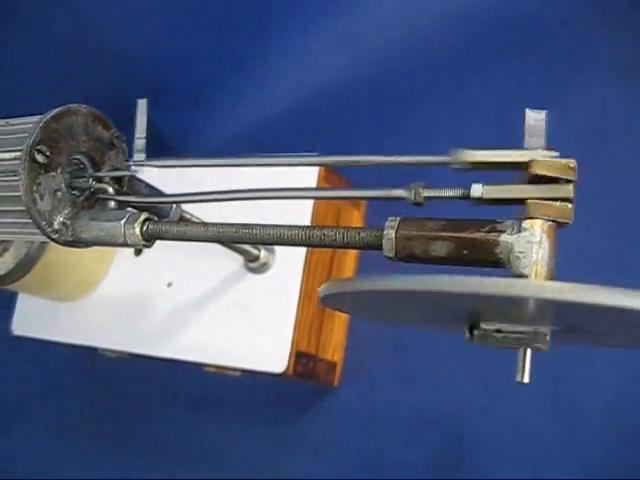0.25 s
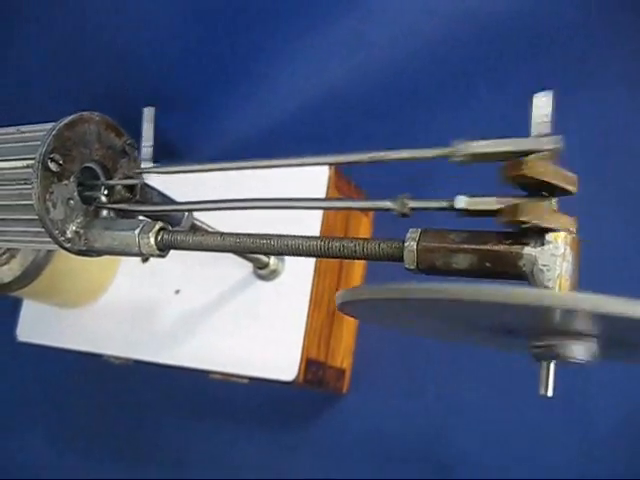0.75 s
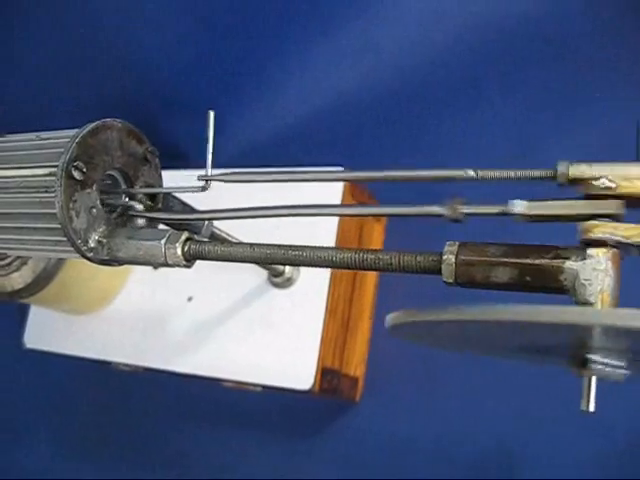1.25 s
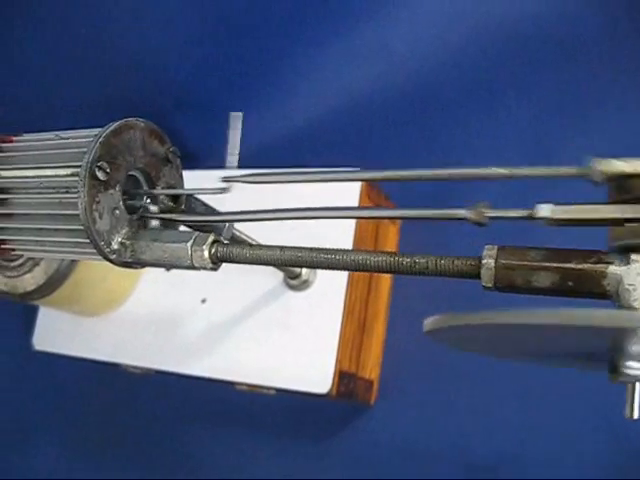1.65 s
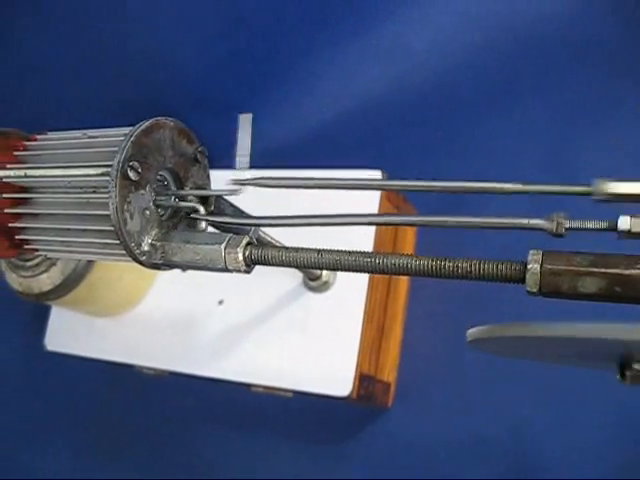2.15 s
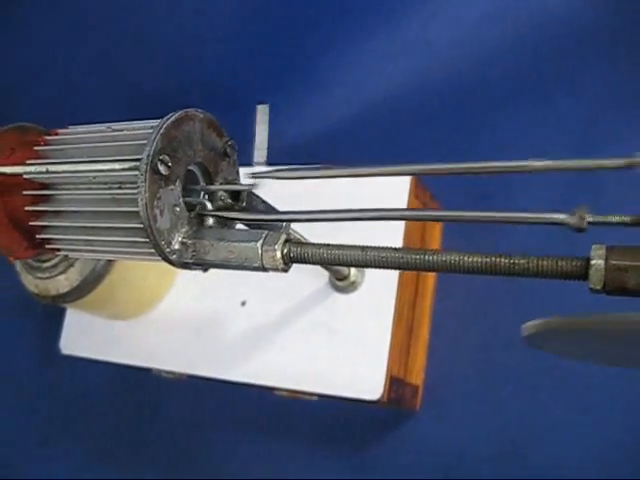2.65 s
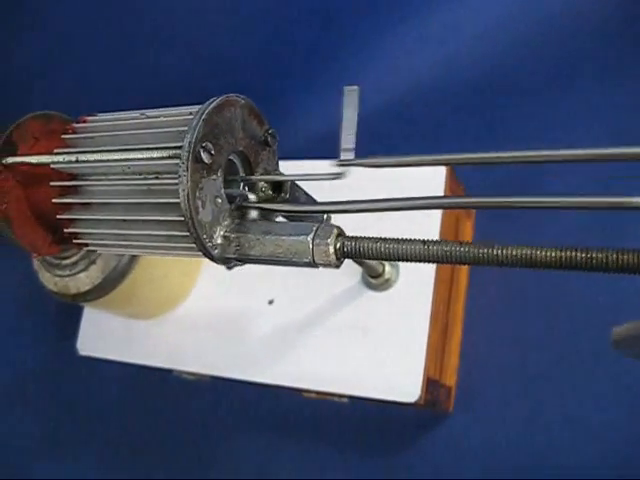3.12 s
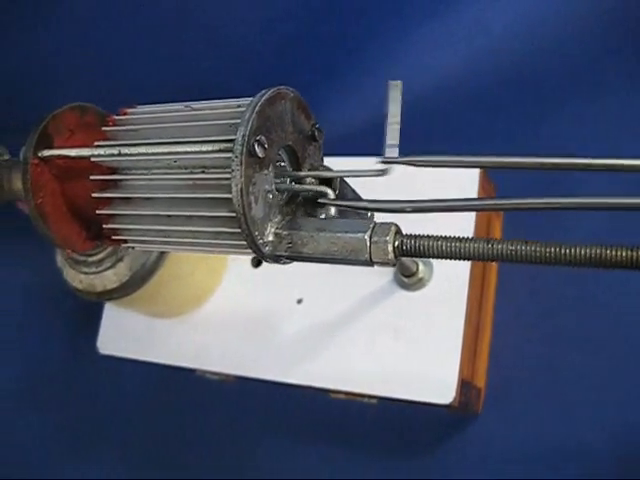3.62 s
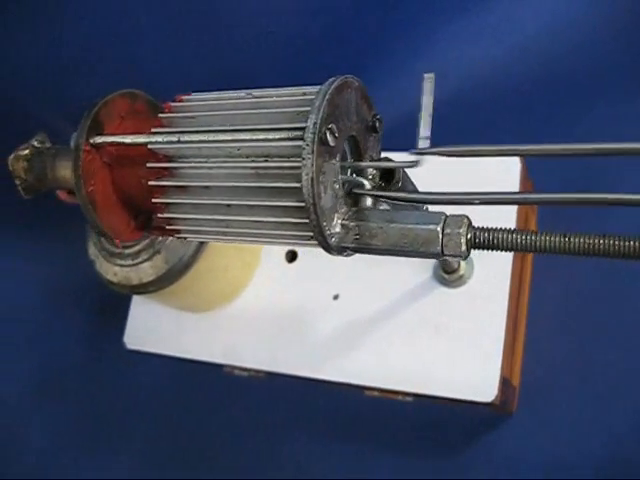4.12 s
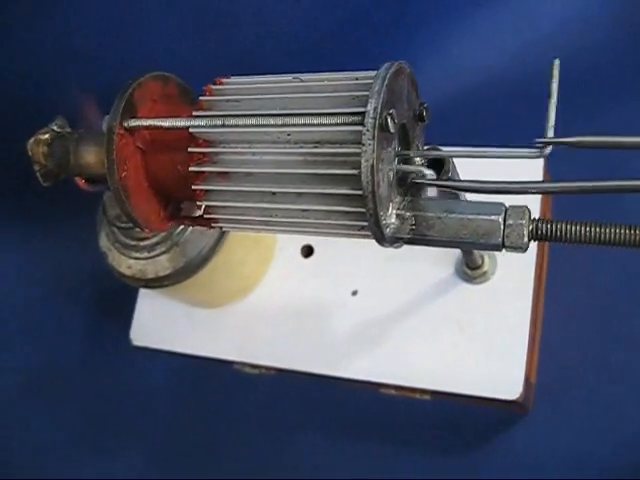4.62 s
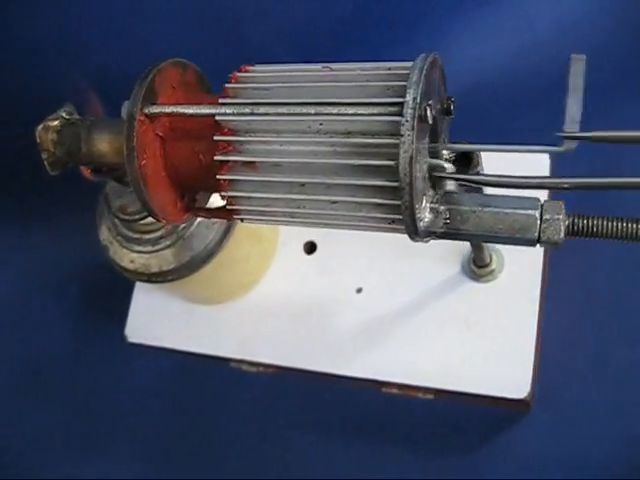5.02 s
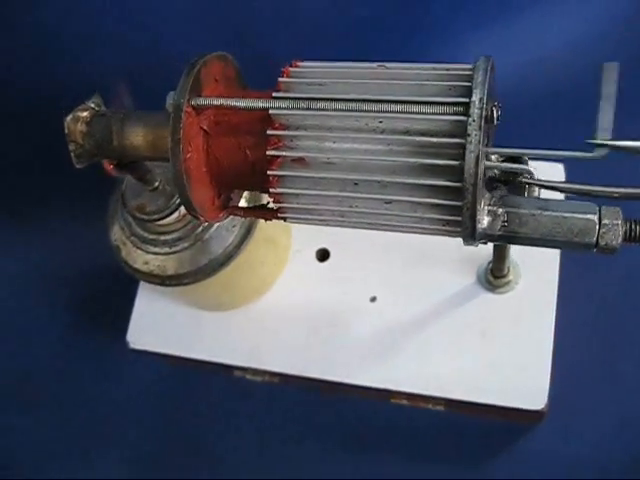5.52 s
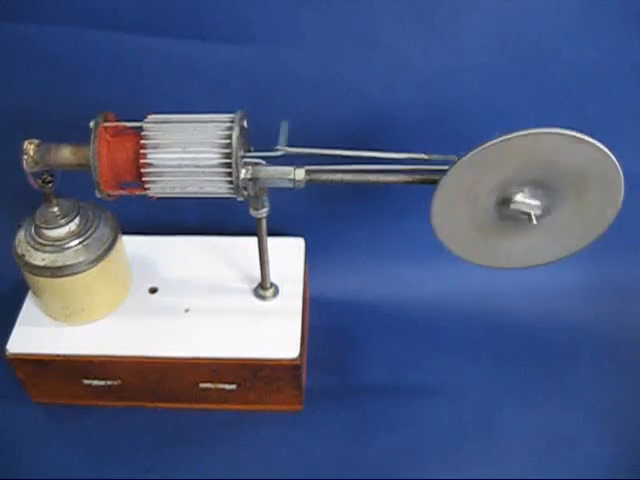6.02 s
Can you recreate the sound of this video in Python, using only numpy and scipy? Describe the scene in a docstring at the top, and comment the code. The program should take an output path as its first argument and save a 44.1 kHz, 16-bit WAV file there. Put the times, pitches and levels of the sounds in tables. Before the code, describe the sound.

Fast rhythmic metallic rattle and scrape of a little model engine, growing brighter and closer, with one sharp snap before an abrupt stop.

```python
"""A small home-made hot-air engine on a wooden box runs at about 4.7 turns a second.
Twice a turn noise slips ring the rod's modes as it scrapes through its guide and the linkage's as it rattles.
Noise bursts at set crank angles are the knocks of its joints; slower slips ring the box into a rumble.
The microphone moves from the flywheel to the cylinder; a slack part snaps once in a small room.
The recorder holds each sample twice and stops abruptly."""
import sys
import numpy as np
from scipy import signal
from scipy.io import wavfile

SR = 44100
rng = np.random.default_rng(int(sys.argv[2]) if len(sys.argv) > 2 else 0)


def persist_wave(psi):
    """Save psi, clipped to +-1, as 16-bit WAV."""
    counts = np.round(np.clip(psi, -1, 1) * 32767).astype(np.int16)
    wavfile.write(sys.argv[1], SR, np.atleast_2d(counts).T)


N = 276489
TIME_S = np.arange(N) / SR


def from_db(db):
    """Decibels to gain."""
    return 10 ** (np.asarray(db) / 20)


def rms_one(x):
    """Scale to unit power."""
    return x / np.sqrt(np.mean(x ** 2) + 1e-20)


def drift(cutoff_hz):
    """Slow random wander of unit rms: low-passed noise."""
    lowpass = signal.butter(2, cutoff_hz, fs=SR, output="sos")
    return rms_one(signal.sosfilt(lowpass, rng.standard_normal(N)))


def arch(at, start, top, end):
    """A quarter sine up from start to top and another down to end; zero outside."""
    return np.sin(np.pi / 2 * np.interp(at, [start, top, end], [0, 1, 0]))


def passing(angle, centre, spread):
    """A bell that reaches 1 each time the crank passes an angle; all in turns."""
    offset = (angle - centre + .5) % 1 - .5
    return np.exp(-.5 * (offset / spread) ** 2)


def resonate(force, modes):
    """Parallel two-pole resonances of alternating sign."""
    out = np.zeros(N)
    for k, (hz, width_hz, db) in enumerate(modes):
        r = np.exp(-np.pi * width_hz / SR)
        poles = [1, -2 * r * np.cos(2 * np.pi * hz / SR), r * r]
        gain = (-1) ** k * from_db(db) * (1 - r * r) / 2
        out += gain * signal.lfilter([1, 0, -1], poles, force + 1e-18)
    return out


def slips(per_s, spread_db, chatter_db, chatter_hz):
    """Tiny random slips of uneven size and sign, whose size swells and sinks as the surfaces chatter."""
    size_db = spread_db * rng.standard_normal(N) + chatter_db * drift(chatter_hz)
    sizes = rng.choice([-1, 1], N) * from_db(size_db)
    return sizes * (rng.random(N) < per_s / SR)


def dying_noise(t60_s):
    """A dense noise burst of unit energy that decays exponentially."""
    t = TIME_S[:int(t60_s * SR) + 2]
    burst = rng.standard_normal(len(t)) * from_db(-60 * t / t60_s)
    return burst / np.sqrt(np.sum(burst ** 2))


def room(x, wet_db, t60_s):
    """The nearby walls add a diffuse decaying tail."""
    return x + from_db(wet_db) * signal.fftconvolve(x, dying_noise(t60_s))[:N]


# crank position: time_s, position_turns
CRANK = [(-0.1015, -1), (1.3816, 6), (2.6517, 12), (3.9165, 18), (6.4440, 30)]


def crank_turns():
    """Crank position in turns, linear between the table's times."""
    return np.interp(TIME_S, *np.transpose(CRANK))


# gain along the microphone's path: time_s, rod_rel_db, linkage_rel_db
NEARNESS = [(0, -45, -35.5), (1.5, -42, -38), (2.7, -37, -37.5), (3.6, -29.5, -33), (4.5, -28.3, -33.5),
            (5.4, -26.5, -35.5), (5.9, -29.5, -38.5)]


def nearness():
    """Gains of rod and linkage as the microphone moves from flywheel to cylinder."""
    time_s, *columns_db = np.transpose(NEARNESS)
    return [from_db(np.interp(TIME_S, time_s, db)) for db in columns_db]


def hiss():
    """Soft steady noise, tilted to the bass by a one-pole filter."""
    return from_db(-54.0) * rms_one(signal.lfilter([1], [1, -.75], rng.standard_normal(N)))


TONE_PEAK_S, TONE_SWELL_S, TONE_FADE_S = 4.25, 1.2, .2
TONE_AT_PEAK_HZ, TONE_RISE_HZ_PER_S, TONE_PEAK_RMS_DB = 180, 12, -42


def low_tone():
    """A faint sine swells once, rising a little in pitch."""
    since_s = TIME_S - TONE_PEAK_S
    hz = TONE_AT_PEAK_HZ + TONE_RISE_HZ_PER_S * since_s
    swell = arch(since_s, -TONE_SWELL_S, 0, TONE_FADE_S)
    return np.sqrt(2) * from_db(TONE_PEAK_RMS_DB) * swell * np.sin(2 * np.pi * np.cumsum(hz) / SR)


# box vibration: multiple_of_crank_speed, nominal_rms_db
HUM = [(12, -49.5), (24, -43)]


def hum(turns):
    """The box vibrates on multiples of the crank speed, wavering in level and phase."""
    out = np.zeros(N)
    for multiple, db in HUM:
        level = from_db(db + 2.5 * drift(3))
        out += level * np.sin(2 * np.pi * multiple * turns + .7 * drift(3))
    return np.sqrt(2) * out


# flywheel and stand: centre_turn (0-1), spread_turns, pitch_hz, level_at_full_push_db
RINGS = [(.015, 0.016, 837, -42), (0.251, 0.057, 809, -44.5), (.29, 0.09, 891, -40.5),
         (.54, .06, 1222, -45), (.8, .13, 286.6, -46), (.875, 0.022, 787, -41), (.89, 0.055, 894, -48.5)]


def rings(angle, width_hz):
    """Noise rubs each mode of flywheel and stand into ringing while the crank passes its angle."""
    out = np.zeros(N)
    for centre, spread, hz, db in RINGS:
        push = passing(angle, centre, spread)
        ring = resonate(push * rng.standard_normal(N), [(hz, width_hz, 0)])
        out += from_db(db) * np.sqrt(np.mean(push ** 2)) * rms_one(ring)
    return out


# box resonances: pitch_hz, width_hz, rel_db
BOX = [(38, 36, -7.5), (58.5, 9, 1), (74, 18, -5.5), (115.5, 25, -1), (143.5, 21.8, -2), (182.6, 35, -7),
       (250, 151, -16), (292.7, 14.8, -8.5), (352, 890, -25.5)]
# extra shaking as the outward stroke turns round
HEAVE_TURN, HEAVE_SPREAD_TURNS, HEAVE_DB = .45, .04, 2


def box(turns):
    """The stand carries the shaking down into the hollow box as a run of soft thuds."""
    shake = from_db(HEAVE_DB * passing(turns, HEAVE_TURN, HEAVE_SPREAD_TURNS))
    force = shake * slips(per_s=900, spread_db=2.5, chatter_db=1.54, chatter_hz=53)
    highpass = signal.butter(2, 24, "high", fs=SR, output="sos")
    return rms_one(signal.sosfilt(highpass, resonate(force, BOX)))


# resonances of the snap: pitch_hz, width_hz, rel_db
SNAP_MODES = [(1120, 550, 1), (1470, 524, 4.5), (1830, 400, 3), (2350, 450, -11), (9230, 726, -10.5)]
# clicks of the one snap: time_s, click_db (the largest also sets the dry peak)
SNAP_CLICKS = [(4.0014, -9), (4.0044, -21), (4.016, -19), (4.035, -25)]


def snap():
    """Something slack snaps once: a few clicks ring modes duller than the joints'."""
    time_s, db = np.transpose(SNAP_CLICKS)
    clicks = np.zeros(N)
    clicks[np.round(time_s * SR).astype(int)] = from_db(db)
    ring = resonate(clicks, SNAP_MODES)
    return from_db(db.max()) * ring / np.abs(ring).max()


# joint resonances, also colouring the rush: pitch_hz, width_hz, rel_db
CLACK_MODES = [(1500, 990, 3), (3020, 1160, 5.5), (5280, 2600, 4)]


def rush(near_rod):
    """Close to the cylinder a soft noise fills the pauses between strokes."""
    return from_db(-21) * near_rod * rms_one(resonate(rng.standard_normal(N), CLACK_MODES))


STRAY_PER_S, STRAY_SPREAD_DB, STRAY_T60_S, STRAY_RMS_REL_DB = 45, 3.5, .012, -9


def stray_ticks():
    """Loose pins chatter at random angles, each tick a short spray of bounces."""
    force = np.zeros(N + SR)
    for at in np.flatnonzero(rng.random(N) < STRAY_PER_S / SR):
        burst = dying_noise(STRAY_T60_S) * from_db(STRAY_SPREAD_DB * rng.standard_normal())
        force[at:at + len(burst)] += burst
    return from_db(STRAY_RMS_REL_DB) * rms_one(force[:N])


# play taken up at the same angles every turn: angle_turn (0-1), clack_rel_db, rod_ring_rel_db
KNOCKS = [(.004, 2, -15), (.014, -5, -15), (.044, -7, -6), (.479, -2, -9), (.503, -1, -8), (.511, -4, -8),
          (.742, -20, -6), (.808, -7, -7), (.846, -13, -9), (.936, -21, -2)]


def knocks(uneven_db, first_contact_db, bounce_t60_s):
    """Forces on joints and rod: a contact, then a short spray of bounces that is new on every turn."""
    seconds, turns = np.transpose(CRANK)
    joints, rod = np.zeros((2, N + SR))
    for turn in range(int(turns[0]), int(turns[-1])):
        for angle, clack_db, ring_db in KNOCKS:
            at = int(np.interp(turn + angle, turns, seconds) * SR) + rng.integers(-20, 20)
            burst = dying_noise(bounce_t60_s)
            burst[0] += from_db(first_contact_db)
            burst *= from_db(uneven_db * rng.standard_normal())
            if 0 <= at < N:
                joints[at:at + len(burst)] += from_db(clack_db) * burst
                rod[at:at + len(burst)] += from_db(ring_db) * burst
    return joints[:N], rod[:N]


def clacks(on_joints, friction):
    """The joints ring to their own knocks and ticks and, almost as strongly, to the rod's grit."""
    force = rms_one(on_joints) + stray_ticks() + from_db(-2.5) * friction
    return from_db(-43) * rms_one(resonate(force, CLACK_MODES))


# the rod's strokes out and back: start_turn, fastest_turn, end_turn, scrape_rel_db, rattle_rel_db
STROKES = [(0, .29, 0.44, 4, 2), (.45, 0.57, 0.91, 1.5, -1.5)]
SCRAPE_POWER, RATTLE_POWER = 1.37, .6  # exponents on the rod's speed
IDLE_RATTLE_REL_DB = -14
# jolt of the linkage once a reversal has taken up its play
JOLT_REL_DB, PLAY_TURNS, JOLT_FADE_TURNS = 0, 0.022, .05


def strokes(angle):
    """Scrape and rattle strength: both follow the rod's speed, and each reversal jolts the rattle."""
    scrape, rattle_power = 0, from_db(IDLE_RATTLE_REL_DB) ** 2
    for start, fastest, end, scrape_db, rattle_db in STROKES:
        speed = arch(angle, start, fastest, end)
        since_jolt = (angle - start - PLAY_TURNS) % 1
        jolt = from_db(JOLT_REL_DB) * np.exp(-since_jolt / JOLT_FADE_TURNS)
        scrape = scrape + from_db(scrape_db) * speed ** SCRAPE_POWER
        rattle_power = rattle_power + (from_db(rattle_db) * speed ** RATTLE_POWER) ** 2 + jolt ** 2
    return scrape, np.sqrt(rattle_power)


# linkage resonances: pitch_hz, width_hz, rel_db
LINKAGE = [(637, 200, -7), (1220, 131, -1.5), (1664, 125, -0.5), (1960, 159, 4), (2458, 123, -1),
           (2742, 194, 1), (3190, 186, 4.5), (3616, 133, 7.5), (4167, 83, 3.5), (4660, 220, -7),
           (6330, 470, -9.5), (6885, 320, -3), (7510, 89, 3.5), (7880, 220, -3), (8340, 216, -7.5),
           (9060, 220, -7), (10180, 46, -8)]


def linkage(rattle, near_linkage):
    """The loose linkage rings to random slips as strong as its rattle."""
    force = rattle * slips(per_s=9000, spread_db=2.0, chatter_db=1.7, chatter_hz=240)
    return from_db(2.5) * near_linkage * rms_one(resonate(force, LINKAGE))


UNEVEN_DB, UNEVEN_CUTOFF_HZ = 1.1, 5.4  # slow wander of the rubbing


def rod_friction(scrape):
    """Stick-slip force of the rod in its guide; no two strokes rub quite alike."""
    strength = scrape * from_db(UNEVEN_DB * drift(UNEVEN_CUTOFF_HZ))
    return rms_one(strength * slips(per_s=7000, spread_db=1.5, chatter_db=3.0, chatter_hz=300))


# rod resonances: pitch_hz, width_hz, rel_db
ROD = [(3107, 91, -12), (3674, 150, -6.5), (3973, 147, 2.5), (4460, 110, -31), (7026, 120, -0.5),
       (7285, 270, -8), (7620, 94, -28), (9820, 110, -39)]


def rod(friction, on_rod, near_rod):
    """Friction and knocks make the dry rod squeal in its own modes."""
    force = friction + from_db(-16.5) * rms_one(on_rod)
    return from_db(1.8) * near_rod * rms_one(resonate(force, ROD))


# large sources follow only a share of the rod's swing in level along the microphone's path
BOX_RMS_DB, BOX_FOLLOWS, RINGS_FOLLOW = -35, .28, .12


def engine():
    """Scrape, rattle, knocks and shaking follow the crank; ticks, rush and low tone run free of it."""
    turns = crank_turns()
    near_rod, near_linkage = nearness()
    scrape, rattle = strokes(turns % 1)
    friction = rod_friction(scrape)
    on_joints, on_rod = knocks(uneven_db=1.0, first_contact_db=-4, bounce_t60_s=0.018)
    ringing = rms_one(near_rod ** RINGS_FOLLOW) * rings(turns % 1, width_hz=37)
    rumble = from_db(BOX_RMS_DB) * rms_one(near_rod ** BOX_FOLLOWS) * box(turns)
    background = low_tone() + hum(turns) + ringing + rumble + rush(near_rod)
    joints = clacks(on_joints, friction) + linkage(rattle, near_linkage)
    return background + joints + rod(friction, on_rod, near_rod)


def scene():
    """The engine in a small room over a soft hiss; the snap lingers in the room."""
    in_room = room(engine(), wet_db=-24.5, t60_s=.3)
    return (hiss() + room(snap(), wet_db=-1.0, t60_s=0.69) + in_room)[None]


RECORDER_BAND_HZ, CUTOFF_HZ, STOP_S = 9700, 15900, 5.917


def record(dry):
    """Sampling at half rate and holding each value mirrors the ringing into the top octave."""
    band = signal.sosfilt(signal.butter(6, RECORDER_BAND_HZ, fs=SR, output="sos"), dry)
    held = np.repeat(band[:, ::2], 2, axis=1)[:, :N]
    stopped = held * (TIME_S < STOP_S)
    return signal.sosfilt(signal.ellip(12, .1, 90, CUTOFF_HZ, fs=SR, output="sos"), stopped)


dry = scene()
out = record(dry)
persist_wave(out)
```